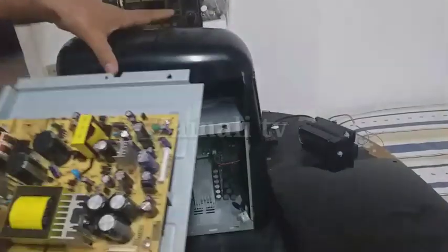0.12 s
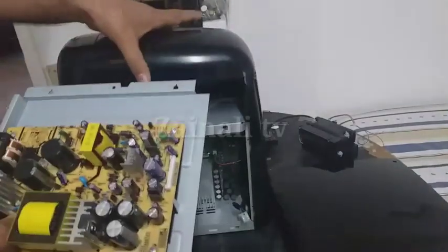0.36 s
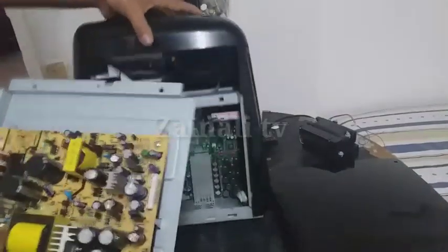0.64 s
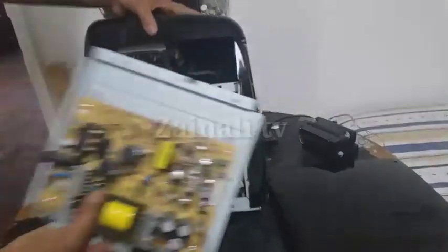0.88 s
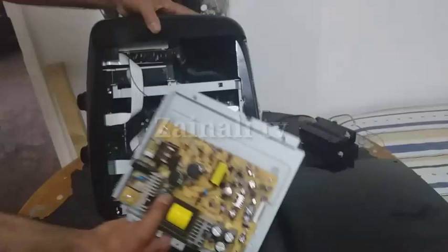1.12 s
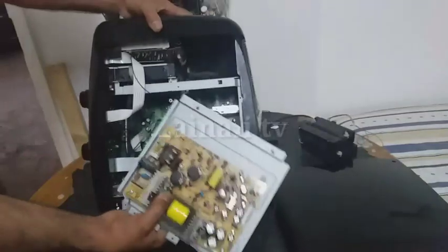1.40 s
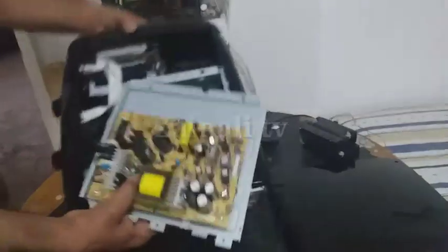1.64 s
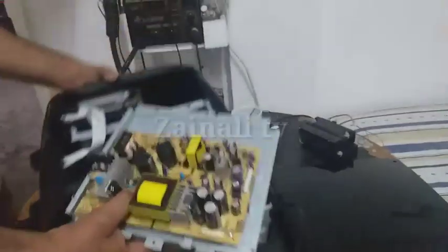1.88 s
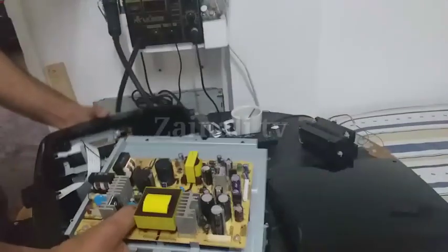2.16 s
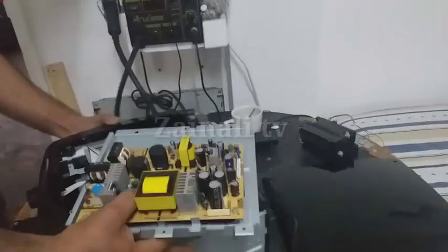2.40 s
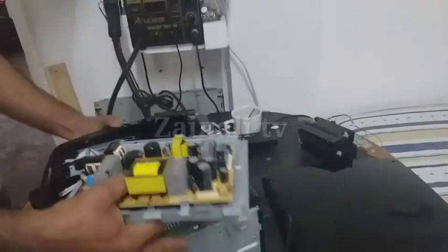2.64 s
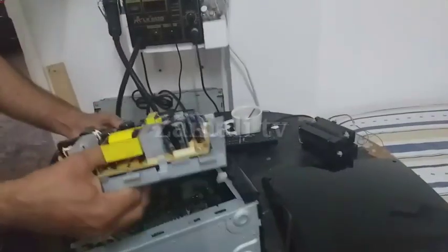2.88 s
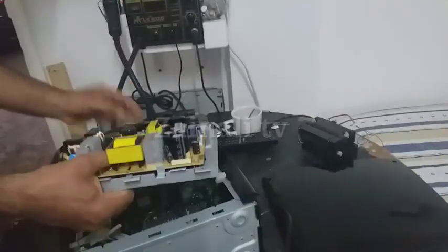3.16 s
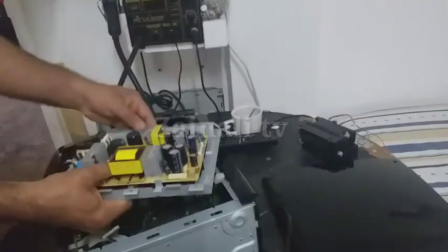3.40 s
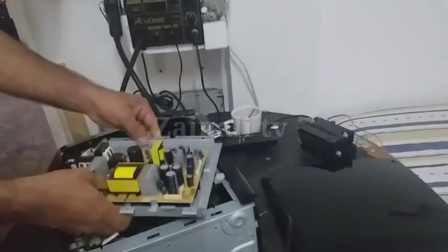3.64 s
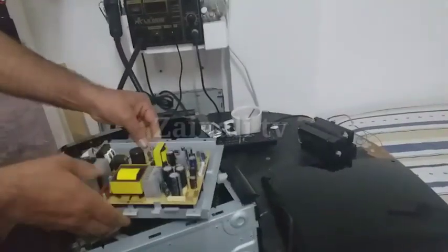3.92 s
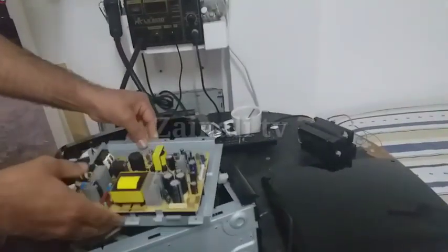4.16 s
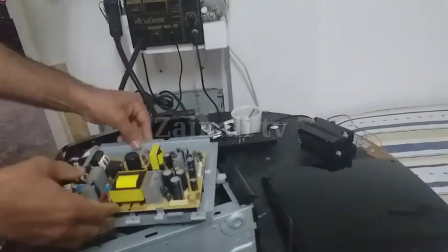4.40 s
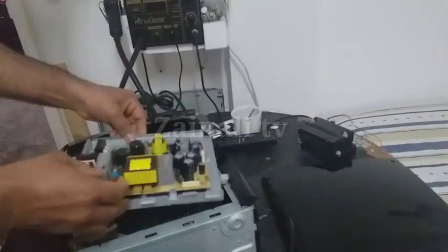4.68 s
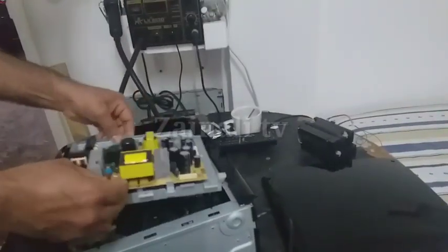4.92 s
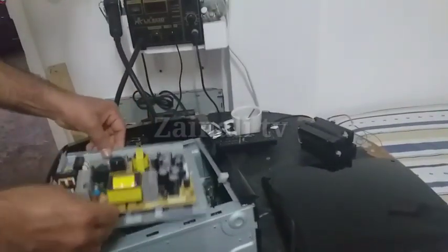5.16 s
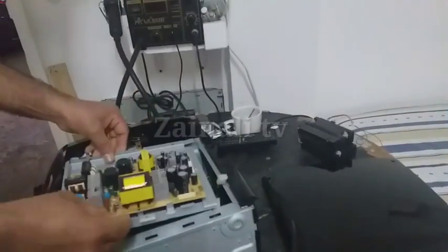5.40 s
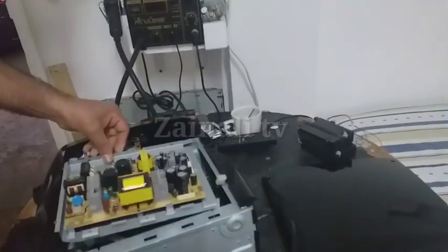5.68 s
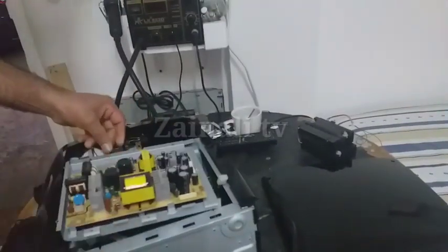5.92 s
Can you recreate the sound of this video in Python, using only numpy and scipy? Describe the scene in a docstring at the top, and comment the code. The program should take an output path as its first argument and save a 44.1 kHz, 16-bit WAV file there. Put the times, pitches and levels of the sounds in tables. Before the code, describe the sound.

A small, bare room with low, softly fluttering air, heard from a nearby, slightly dull microphone. From 0 to 0.9 s, hands rub a hollow plastic case, with muffled knocks, low bench thumps and light metal ticks; a firmer knock lands at 0.75. Faint squeaks follow, then a bump at 1.4 and a click near 1.7. Brief low shudders of the pushed case lead to a knock and metallic click around 2.15. Small crisp ticks at 2.7 give way to near quiet. At 3.65 a sharp clack with a hollow knock starts the fitting; lighter taps and scraping cluster from 4.0 to 4.55. A hard clack strikes at 4.67. The loudest event, a bright, rapid sheet-metal clatter, runs from 5.17 to 5.27, followed by a short scrape. It rings off briefly, leaving room air and barely audible ticks near 5.9 to 6.0.

```python
"""Small bare room: a metal tray with a circuit board is turned in the hands, laid into a metal chassis.
Case knocks and bench booms are decaying modes; metal clicks are dying noise plus sheet ringing.
Sliding hands are random slips driving case and sheet; faint chirps are narrow fading noise.
Shudders are short wavering hums. Sparse echoes and steady, softly fluttering room air surround it."""
import sys
import numpy as np
from scipy import signal
from scipy.fft import rfft, irfft
from scipy.io import wavfile
from scipy.ndimage import uniform_filter1d

SR = 44100
rng = np.random.default_rng(int(sys.argv[2]) if len(sys.argv) > 2 else 0)


def voltage_ratio(level):
    """Linear amplitude factor for a level in decibels (scalar or array-like)."""
    return 10 ** (np.asarray(level, float) / 20)


def generate_wav(sig):
    """Save sig (samples, or channels by samples) to the path in sys.argv[1] as 16-bit PCM at SR."""
    pcm = np.round(np.clip(np.atleast_2d(sig).T, -1, 1) * 32767).astype(np.int16)
    wavfile.write(sys.argv[1], SR, pcm)


N = 266716

# room air, relative spectrum: [f/Hz, level/dB]
AIR_SPECTRUM = [(18, -53), (30, 13.5), (145, -9.5), (245, -18.5), (364, 10), (461, -4.5), (526, 4),
                (1280, -17), (5040, -34), (7270, -18), (8980, -26.5), (14800, -36), (16000, -54)]
# soft background resonances: [f/Hz, width/Hz, rms level/dB]
WHISTLES = [(350, 94, -74), (1945, 59, -78), (4270, 490, -73.5)]
# hands sliding, breakpoints: [t/s, case drag level/dB, tray scrape level/dB]
SLIDING = [(0.0, -50.5, -58), (0.27, -66, -62), (0.6, -51, -61), (0.8, -53.5, -62), (1.1, -71.5, -60),
           (1.5, -61, -65.5), (1.84, -58.5, -59), (2.03, -62.5, -66.5), (2.08, -63, -59), (2.21, -46, -53),
           (2.36, -85, -64), (2.9, -67, -60.5), (3.49, -76, -61), (3.75, -70, -50), (4.09, -59.5, -57.5),
           (4.28, -61, -48), (4.47, -59, -57.5), (4.64, -75, -54.5), (4.72, -49.5, -42.5), (4.95, -69, -79),
           (5.31, -56.5, -40), (5.551, -73.5, -71.5), (6.05, -65, -60)]
# plastic case modes: [f/Hz, level/dB, t60 as factor on the given ring time]
CASE_MODES = [(215, 0.5, 1.33), (289.4, 6, 0.92), (364.2, 1, 0.93), (402, 2, 0.62), (519.4, 2.5, 0.78),
              (616.5, 0.5, 1.07), (686, 5.5, 0.5), (780.6, -1, 0.63), (901, 3.5, 0.42), (1109, 1, 0.57),
              (1198, -7, 1.6), (1565, -9, 0.68)]
# sheet-metal modes that stand out of the dense crowd: [f/Hz, level/dB, t60/s]
TRAY_MODES = [(2600, -5, .1), (2940, 18, 0.18), (3800, 11, 0.28), (4630, 14.5, 0.12), (5130, 42, 0.0093),
              (6800, 9, 0.11)]
# dull case knocks: [t/s, peak level/dB, centre of blow f/Hz, ring t60/s, focus/(dB/octave^2)]
KNOCKS = [(0.001, -43.5, 228, 0.077, 13), (0.139, -39.5, 393, 0.065, 8), (0.222, -44.5, 404, 0.053, 21),
          (0.413, -46, 360, 0.17, 1), (0.433, -37, 202, 0.087, 15), (0.536, -42.5, 393, 0.13, 29),
          (0.567, -44.5, 1320, 0.043, 23), (0.62, -36.5, 513, 0.056, 11), (0.649, -40, 290, 0.066, 13),
          (0.691, -39.5, 400, 0.1, 15), (0.736, -25.5, 666, 0.047, 13), (0.796, -34.5, 287, 0.077, 28),
          (0.908, -39, 290, 0.18, 4), (1.396, -30.5, 380, 0.078, 4.5), (1.613, -38.5, 470, 0.12, 6.5),
          (2.046, -47.5, 645, 0.15, 6), (2.129, -44, 215, 0.23, 38), (2.156, -28, 510, 0.058, 11),
          (2.166, -28.5, 383, 0.057, 1.5), (2.211, -48, 450, 0.063, 0), (2.427, -47, 347, 0.12, 1),
          (2.566, -44.5, 390, 0.16, 2.5), (2.768, -44, 305, 0.15, 3), (3.124, -49.5, 840, 0.3, 15),
          (3.62, -32, 463, 0.58, 8.5), (3.644, -26, 290, 0.207, 5), (3.731, -36, 514, 0.047, 7),
          (3.993, -37, 448, 0.34, 11), (4.123, -30, 435, 0.17, 23), (4.187, -29, 470, 0.036, 5.5),
          (4.215, -43, 420, 0.04, 11), (4.324, -36.5, 385, 0.15, 20), (4.348, -28, 490, 0.045, 7),
          (4.362, -36, 473, 0.078, 11), (4.386, -31.5, 440, 0.03, 3), (4.671, -19.5, 215, 0.039, 25),
          (4.672, -23, 560, 0.062, 10), (5.133, -37.5, 463, 0.08, 15), (5.168, -19, 590, 0.063, 17),
          (5.183, -25.5, 292, 0.12, 31), (5.229, -24, 527, 0.035, 15), (5.265, -27.5, 470, 0.042, 21),
          (5.337, -33.5, 407, 0.17, 10), (5.995, -46.5, 950, 0.32, 31), (6.003, -46.5, 267, 0.45, 25)]
# case bumps on the bench: [t/s, top boom level/dB, leg sway level/dB]
BUMPS = [(0.001, -34.5, -51.5), (0.405, -43, -49), (0.43, -29.5, -68), (0.618, -44, -49), (0.732, -32, -53),
         (0.799, -45, -66), (0.908, -42.5, -51), (1.391, -33, -47), (1.719, -49, -80), (1.959, -50, -78),
         (2.055, -46, -79), (2.154, -32.5, -42), (2.774, -41.5, -64), (3.642, -35, -51),
         (3.731, -45.5, -76), (4.123, -46.5, -56), (4.186, -42, -50), (4.671, -52, -57),
         (5.185, -44.5, -64.5), (5.904, -58.5, -75)]
# faint chirps and squeaks, slightly rough, fading: [t/s, initial rms level/dB, f/Hz, t60/s]
CHIRPS = [(.01, -65, 5030, 0.32), (0.056, -68, 4030, .37), (.543, -58, 2870, 0.12), (.72, -60, 2300, 0.22),
          (.9, -58, 2660, 0.13), (.97, -68, 2780, 1), (1.021, -75, 4350, .9), (1.095, -62, 5130, .4),
          (1.164, -63, 3980, 0.29), (1.248, -75.5, 2950, 0.2), (1.36, -67, 4560, 0.69),
          (1.415, -63, 5100, 0.64), (1.75, -59, 5060, 0.34), (1.945, -56, 4080, 0.19),
          (1.95, -62, 2070, 0.31), (2.059, -61, 2650, .7), (2.075, -59, 5020, 0.33), (2.08, -53, 820, .5),
          (2.155, -52, 2210, .2), (2.41, -60.5, 4920, .4), (2.43, -63, 1910, 0.31), (2.48, -66, 4080, .2),
          (2.555, -58.5, 1880, 0.23), (2.73, -65, 4930, 0.8), (3.07, -62, 4930, 0.84),
          (3.145, -63, 3950, 0.36), (3.435, -67, 3830, 0.32), (4.51, -53.5, 1500, 0.29),
          (5.48, -65, 5180, 0.3), (5.8, -68, 5080, 0.47)]
# metal edges meeting: [t/s, level/dB, mid-band offset/dB, treble offset/dB, rattle t60/s]
CLICKS = [(0.141, -33.5, -2, -6.5, 0.17), (0.544, -43, -6.5, -6, 0.22), (0.6182, -49, -13, -29, 0.1),
          (0.667, -41.5, -18, -12, 0.054), (0.6878, -43.5, -16, -9, 0.048), (0.7194, -43, -15, -4, 0.07),
          (0.738, -35, -15, -16, 0.048), (0.7996, -35, -49, -8, 0.026), (0.851, -39, -12, -0.5, 0.04),
          (0.901, -42, -2, -6, 0.068), (1.3978, -37, -9.5, -14, 0.1), (1.6176, -43.5, 5, -18, 0.03),
          (1.661, -37.5, -22, -17, 0.017), (1.6833, -31, -12.5, -9.5, 0.033), (1.9457, -45.5, 0, -27, 0.24),
          (2.0795, -45, 11, -23, 0.37), (2.127, -32, -4, -13, 0.081), (2.1568, -27, -16.5, -6, 0.097),
          (2.4269, -43.5, -6, -10.5, 0.13), (2.557, -45.5, -10, -36, 0.073),
          (2.702, -35.5, -61, 0.5, 0.016), (2.7377, -32.5, -53, 19, 0.033), (2.768, -55, -15, -30, 0.11),
          (2.8154, -43.5, -5, -12, 0.05), (2.8482, -42.5, -20, -6, 0.071), (3.009, -46.5, -6, -33, 0.03),
          (3.15, -45.5, -14.5, -6, 0.39), (3.495, -44.5, -17, -4, 0.55), (3.5792, -40, -20, -6.5, 0.12),
          (3.62, -26, -14, -11, 0.04), (3.646, -14.5, -15.5, -4.5, 0.043), (3.7844, -33, -22, -9.5, 0.047),
          (3.9956, -40, 1, -4, 0.073), (4.0319, -31.5, -9.5, -12.5, 0.038), (4.1128, -33.5, -15, -5, 0.15),
          (4.1254, -23, -8, -6.5, 0.089), (4.129, -24, -11.5, -11, 0.043), (4.187, -33.5, -8.5, -15, 0.078),
          (4.229, -40, -18, 6, 0.073), (4.276, -34.5, -20, -6.5, 0.069), (4.3245, -34.5, -5, -12, 0.18),
          (4.3567, -26.5, -13, -5, 0.066), (4.525, -39.5, -23, -5, 0.11), (4.544, -27.5, -22, 3.5, 0.09),
          (4.664, -35, -12, -10, 0.064), (4.67, -10.5, -14, -6, 0.075), (5.1337, -37, -5.5, -19, 0.077),
          (5.165, -4.5, -14.5, 1.5, 0.19), (5.178, -14.5, -13.5, -10, 0.075), (5.1946, -13, -15, -18, 0.07),
          (5.216, -15, -7.5, -8, 0.034), (5.232, -26.5, -6, -3, 0.039), (5.2621, -12.5, -17.5, -7, 0.067),
          (5.901, -51, -16, -11, 0.048), ]
# case pushed along: [start t/s, length/s, rms level at full swell/dB, f/Hz]
SHUDDERS = [(1.7, 0.051, -57, 192), (1.773, 0.065, -51, 223), (1.899, 0.05, -54.5, 232),
            (1.955, 0.037, -53, 198), (2.813, 0.049, -57.5, 230), (2.931, 0.053, -57.5, 214)]
# echo decay: [f/Hz, t60/s]
ROOM_T60 = [(70, 0.11), (200, 0.27), (500, 0.43), (2000, 0.49), (6000, 0.22), (12000, 0.18)]
# microphone response: [f/Hz, level/dB]
MICROPHONE = [(30, -31), (60, -8), (120, -3), (7300, -3.5), (9000, -15.5), (11000, -10.5), (15300, -13.5),
              (15900, -45)]


def evened(x):
    """Scales to rms 1."""
    return x / np.sqrt(np.mean(x ** 2) + 1e-20)


def read(points, hz):
    """Interpolates a curve on a log-frequency axis."""
    f, value = np.transpose(points)
    return np.interp(np.log(hz + 1), np.log(f + 1), value)


def coloured(x, points):
    """Filters by a spectrum of (f/Hz, level/dB)."""
    hz = np.fft.rfftfreq(len(x), 1 / SR)
    return irfft(rfft(x) * voltage_ratio(read(points, hz)), len(x))


def wander(hz):
    """Slow random drift of rms 1: noise averaged twice over 1/hz."""
    width = int(SR / hz)
    once = uniform_filter1d(rng.standard_normal(N), width)
    return evened(uniform_filter1d(once, width))


def narrow(hz, width_hz):
    """Noise through one resonance, rms 1."""
    resonance = signal.iirpeak(hz, hz / width_hz, SR)
    return evened(signal.lfilter(*resonance, rng.standard_normal(N)))


def add(mix, s, sound):
    """Mixes a sound in at s seconds."""
    part = mix[max(round(s * SR), 0):][:len(sound)]
    part += sound[:len(part)]


def ring(modes, t):
    """Sum of dying modes; random levels and detuning stand for a random strike spot."""
    hz, db, t60_s = np.transpose(modes)[:, :, None]
    spot = voltage_ratio(1.5 * rng.standard_normal(hz.shape))
    detune = 1 + 0.0168 * rng.standard_normal(hz.shape)
    swings = np.sin(2 * np.pi * hz * detune * t)
    return (spot * voltage_ratio(db - 60 * t / t60_s) * swings).sum(0)


def sheet(t):
    """Thin sheet metal: modes so dense that it rings as dying noise, a few standing out."""
    crowd = rng.standard_normal(len(t)) * voltage_ratio(-60 * t / 0.34)
    return evened(crowd) + 0.25 * evened(ring(TRAY_MODES, t))


def boom(t):
    """Bench-top mode: swings up over milliseconds, then dies."""
    boom_hz, rise_s, t60_s = 148.6, 0.0086, 0.24
    return np.sin(2 * np.pi * boom_hz * t) * (1 - np.exp(-t / rise_s)) * voltage_ratio(-60 * t / t60_s)


def background():
    """Noise shaped as room air, plus noise in a few fluttering resonances."""
    air_db = -67.5 + wander(1.4)
    out = voltage_ratio(air_db) * evened(coloured(rng.standard_normal(N), AIR_SPECTRUM))
    for hz, width_hz, db in WHISTLES:
        out += narrow(hz, width_hz) * voltage_ratio(db + wander(1.7))
    return out


def sliding():
    """Stick-slip grains drive the case and bench top (drag) and the sheet metal (scrape)."""
    s, *levels = np.transpose(SLIDING)
    drag_db, scrape_db = (np.interp(np.arange(N) / SR, s, c) for c in levels)
    t = np.arange(SR // 4) / SR
    slips_per_s = np.array([[1500], [5000]])  # drag, scrape
    slips = (rng.random((2, N)) < slips_per_s / SR) * rng.standard_normal((2, N))
    slips = slips * voltage_ratio([[2], [2.5]] * wander(60))

    modes = [(f, d - 4 * np.log2(f / 250), 0.034 * k) for f, d, k in CASE_MODES]
    body = ring(modes, t) + 0.82 * boom(t)
    drag = evened(signal.oaconvolve(slips[0], body)[:N])

    ringing = evened(signal.oaconvolve(slips[1], sheet(t))[:N])
    scrape = slips[1] + ringing * slips[1].std()
    scrape = coloured(scrape, [(500, 0.5), (1200, -3), (7000, -9.5), (9000, -13.0), (14000, -7)])
    return drag * voltage_ratio(drag_db) + evened(scrape) * voltage_ratio(scrape_db)


def knocks():
    """A blow wakes the case modes near its centre frequency."""
    out, t = np.zeros(N), np.arange(SR // 2) / SR
    for s, db, hz, t60_s, focus_db in KNOCKS:
        near = [(f, d - max(focus_db, 1) * np.log2(f / hz) ** 2, max(t60_s, .02) * k)
                for f, d, k in CASE_MODES]
        body = ring(near, t) * (1 + 2.1 * voltage_ratio(-60 * t / 0.056))  # first swings strongest
        body = body * np.minimum(t / 0.0021, 1) ** 2  # blow presses in
        # each knock is thinned below its own centre frequency
        highpass = signal.butter(3, 0.62 * hz, "high", fs=SR, output="sos")
        body = signal.sosfilt(highpass, body)
        # loose panels flutter
        flutter = evened(uniform_filter1d(rng.standard_normal(len(t)), size=400))
        body = body * voltage_ratio(np.minimum(t / 0.025, 1) * 4.2 * flutter)
        add(out, s, voltage_ratio(db) * body / abs(body).max())
    return out


def bench():
    """Each bump booms in the top and sways the legs, heard as narrow low noise."""
    sway_rise_s, sway_t60_s = 0.048, 0.37
    top, sway, t = np.zeros(N), np.zeros(N), np.arange(SR // 2) / SR
    for s, boom_db, sway_db in BUMPS:
        add(top, s, voltage_ratio(boom_db) * boom(t))
        add(sway, s, voltage_ratio(sway_db - 60 * t / sway_t60_s) * np.minimum(t / sway_rise_s, 1))
    return top + narrow(73, 6.3) * sway


def chirps():
    """Faint chirps and squeaks: narrow noise, a slightly rough tone that starts fast and fades."""
    out, t = np.zeros(N), np.arange(SR // 3) / SR
    width_hz, rise_s = 95, 0.0016
    end_fade = np.clip((t[-1] - t) / .1, 0, 1)
    for s, db, hz, t60_s in CHIRPS:
        resonance = signal.iirpeak(hz, hz / width_hz, SR)
        noise = rng.standard_normal(2 * len(t))
        tone = evened(signal.lfilter(*resonance, noise)[len(t):])  # settled half
        decay = voltage_ratio(db - 60 * t / max(t60_s, .03))
        add(out, s, tone * decay * (1 - np.exp(-t / rise_s)) * end_fade)
    return out


def clicks():
    """Sharp tick, short gritty rattle, and the sheet metal ringing on."""
    out, t = np.zeros(N), np.arange(SR // 3) / SR
    for s, db, mid_db, top_db, t60_s in CLICKS:
        roughness = evened(uniform_filter1d(rng.standard_normal(len(t)), 40))
        grit = rng.standard_normal(len(t)) * voltage_ratio(4.3 * roughness)
        rattle = grit * (voltage_ratio(-60 * t / max(t60_s, .004)) + 0.46 * voltage_ratio(-60 * t / 0.0092))
        rattle = rattle + 1.01 * sheet(t) * rattle.std()

        tone = [(400, mid_db + 0.5), (700, mid_db + 11.5), (1000, mid_db + 16.5), (1600, mid_db + 15),
                (2550, mid_db + 13.5), (3300, 1.5), (8000, -3.5), (9500, top_db), (16000, top_db)]
        spread = rfft(coloured(rattle, tone))
        # each spot of the sheet favours other pitches
        lumps = evened(uniform_filter1d(rng.standard_normal(len(spread)), size=220))
        tick = irfft(spread * voltage_ratio(2.37 * lumps), len(t)) * np.minimum(t / 0.000089, 1)
        # extra treble at the onset
        treble = signal.lfilter(*signal.butter(2, 6000, "high", fs=SR), tick)
        tick = tick + 0.92 * treble * voltage_ratio(-60 * t / 0.036)
        tick = tick * np.clip((t[-1] - t) / .05, 0, 1) ** 2
        nominal_peak = 3.05 * tick[:SR // 200].std()  # from the first 5 ms
        add(out, s, voltage_ratio(db) * tick / nominal_peak)
    return out


def shudders():
    """Case pushed along: a wavering hum swells and fades."""
    out, waver = np.zeros(N), 1 + 0.028 * wander(24)
    for s, length_s, db, hz in SHUDDERS:
        swell = voltage_ratio(db) * np.hanning(round(length_s * SR)) ** 0.23
        phase = 2 * np.pi * hz * np.cumsum(waver[round(s * SR):][:len(swell)]) / SR
        add(out, s, swell * np.sqrt(2) * np.sin(phase))
    return out


def room(x):
    """Sparse random-sign echoes, each band with its own decay; three tails trade shares."""
    out, turn_rad = np.zeros(N), np.arange(N) / SR * 7
    for k in range(3):
        taps = np.zeros(SR)
        at = np.arange(200, SR - 20, 20)
        taps[at + rng.integers(0, 20, len(at))] = rng.choice([-1., 1.], len(at))
        hz, t, z = signal.stft(taps, SR, nperseg=256)
        decay = voltage_ratio(-60 * t / read(ROOM_T60, hz)[:, None])
        tail = signal.istft(z * decay, SR, nperseg=256)[1]
        share = np.sqrt(2 / 3) * np.cos(turn_rad + k * np.pi / 3)
        out += signal.oaconvolve(x * share, tail / np.linalg.norm(tail))[:N]
    return out


def scene():
    """Case, bench, metal and hands with echoes, over chirps and background."""
    case, metal, hands = knocks() + shudders(), clicks(), sliding()
    echoes = room(voltage_ratio(-6.5) * case + voltage_ratio(-12.0) * metal + voltage_ratio(-20.5) * hands)
    return (case + bench() + metal + hands + echoes + chirps() + background())[None]


def low_pass(x):
    """Removes everything above the highest recorded frequency."""
    return signal.sosfilt(signal.butter(12, 16640, fs=SR, output="sos"), x)


def record(dry):
    """Microphone response colours the mix."""
    mix = coloured(dry[0], MICROPHONE)[None]
    return low_pass(mix)


dry = scene()
out = record(dry)
generate_wav(out)
```